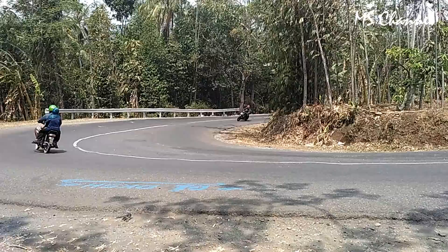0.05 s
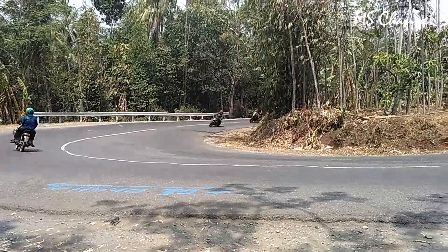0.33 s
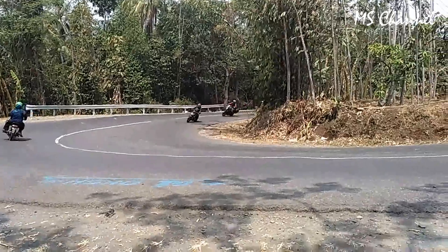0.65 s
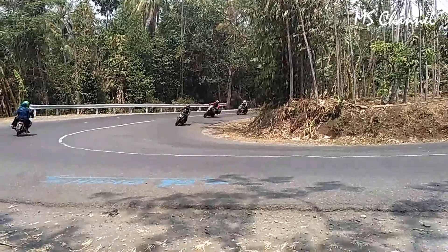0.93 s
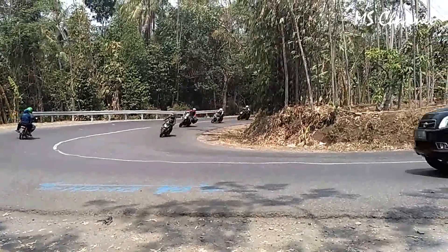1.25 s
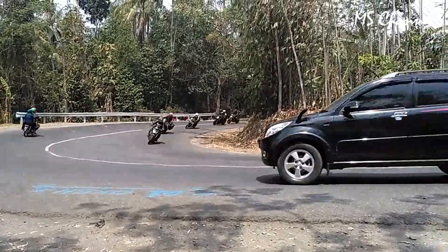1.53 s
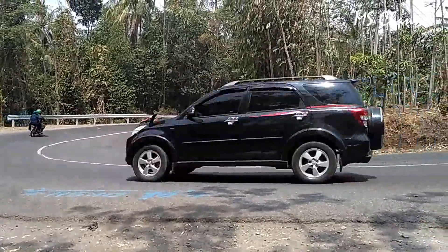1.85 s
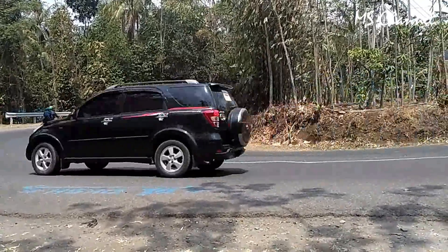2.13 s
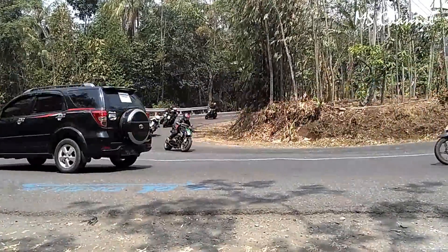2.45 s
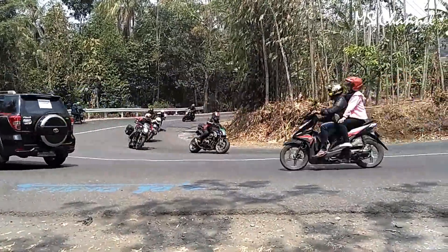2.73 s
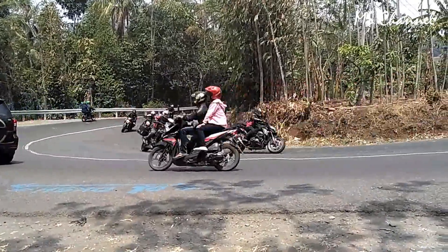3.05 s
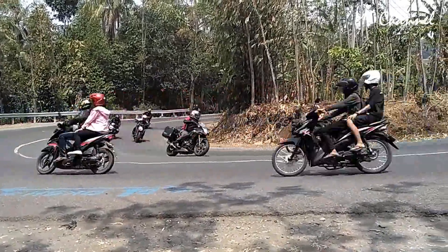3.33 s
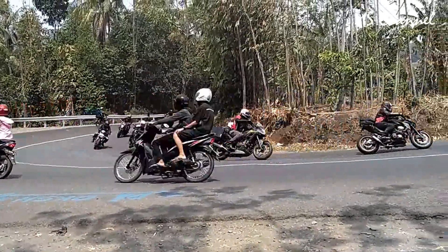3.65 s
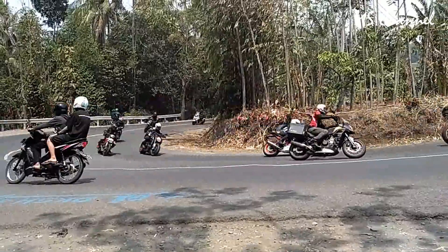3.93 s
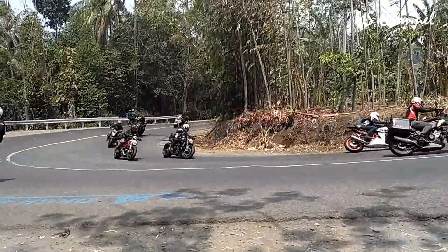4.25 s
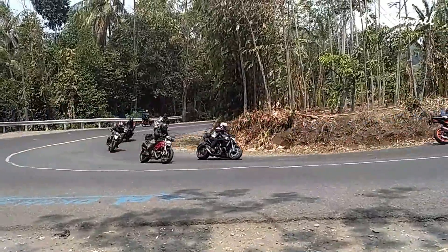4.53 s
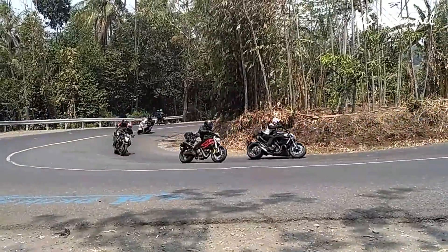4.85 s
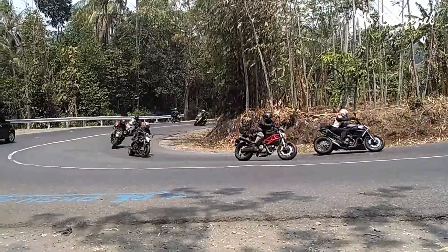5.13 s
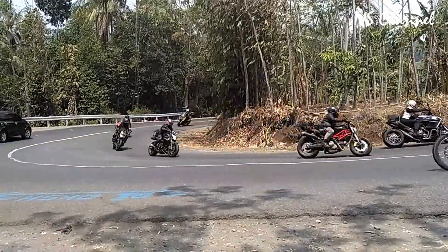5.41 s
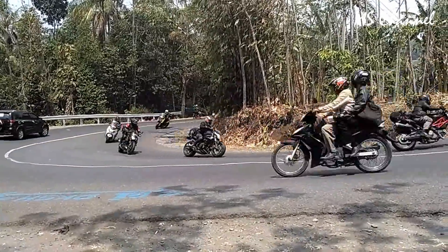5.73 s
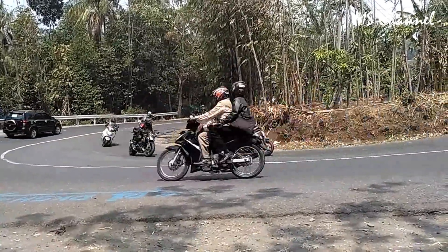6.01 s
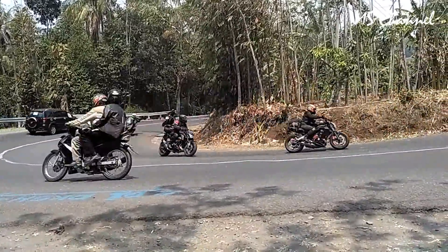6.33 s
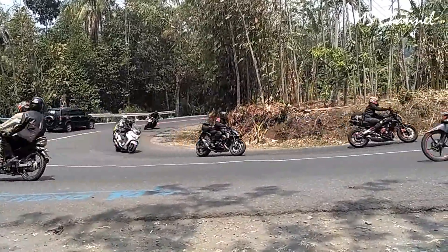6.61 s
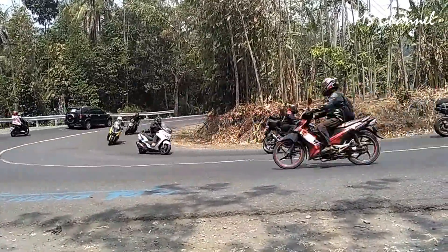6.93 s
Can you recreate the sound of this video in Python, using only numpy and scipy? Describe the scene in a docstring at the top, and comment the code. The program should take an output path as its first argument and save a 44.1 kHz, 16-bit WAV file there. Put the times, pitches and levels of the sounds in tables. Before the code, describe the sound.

A scooter and a car roll away round a bend on a forest road, and a throttle blips further off. A big twin-cylinder motorcycle revs close by, then accelerates with a barking, popping, rattling exhaust. A smoother bike climbs in pitch beside it while small scooters putter past. Tyres hiss and rumble underneath, and the trees return a short echo to the stereo microphones on the verge.

```python
"""A scooter and a car roll away round a bend on a forest road, heard from a microphone pair on the verge.
A far throttle is blipped, then a big twin revs close by and pulls out of the bend, barking and popping,
while a smoother bike climbs in pitch beside it and commuter scooters putter past. The low engine notes
are exhaust pulses ringing in silencers; the twin's rasp is turbulent gas and rattling steel.
Underneath, tyres hiss and rumble, and the trees send back a short echo."""
import sys
import numpy as np
from scipy import signal
from scipy.fft import rfft, irfft, next_fast_len
from scipy.io import wavfile
from scipy.ndimage import uniform_filter1d

SR = 44100
rng = np.random.default_rng(int(sys.argv[2]) if len(sys.argv) > 2 else 0)


def inscribe(sig):
    """Save sig as 16-bit PCM at rate SR to the path in sys.argv[1].

    A 1-D sig is mono; a 2-D sig holds one channel per row.
    Samples are clipped to [-1, 1] before scaling.
    """
    pcm = np.round(np.clip(np.atleast_2d(sig).T, -1, 1) * 32767)
    wavfile.write(sys.argv[1], SR, pcm.astype(np.int16))


N = 307377
TIME = np.arange(N) / SR

# silencer responses of the passing and blipped engines: frequency_hz, gain_db
LEAVING_PIPE = [(40, -18.5), (110, -4), (220, 2), (320, 2), (450, -31), (560, -19), (650, -11), (850, -23),
                (1200, -34.5), (4000, -56.5)]
SCOOTER_PIPE = [(40, -29), (78, 7), (130, 2.5), (250, 3), (340, -1.5), (450, -15), (650, -26.5), (900, -40),
                (1400, -33.5), (4000, -75)]
PUTTER_PIPE = [(50, -23.5), (75, -12.5), (130, -5), (195, 2.5), (255, -7.5), (340, 1), (450, -16.5),
               (650, -31.5), (900, -31), (1400, -37.5), (4000, -80)]
CAR_PIPE = [(60, -6.5), (112, -15), (168, 6), (225, -0.5), (278, 5), (340, -5), (450, -18), (560, -7),
            (690, -14), (900, -35), (4000, -65)]
BLIP_PIPE = [(50, -23.5), (160, -9), (240, 7), (320, 8.5), (410, -1), (500, -10), (700, -9), (900, -31),
             (1300, -59.5), (4000, -72)]
BOOM_PIPE = [(60, -19.5), (120, 6), (170, 10), (250, 2.5), (330, -6.5), (450, -15), (800, -21.5),
             (1300, -33.5), (4000, -67.5)]
SILENCERS = {"leaving": LEAVING_PIPE, "scooter": SCOOTER_PIPE, "putter": PUTTER_PIPE, "car": CAR_PIPE,
             "open": BLIP_PIPE, "boom": BOOM_PIPE}  # those responses by name
# the twin's exhaust surges under throttle: peak_s, rise_s, fade_s, bark_db, spit_db, rattle_db
SURGES = [(2.85, 0.036, 0.14, -47, -56, -50), (3.35, 0.13, 0.42, -45.5, -58, -56),
          (4.08, 0.18, 0.42, -36, -53, -74), (4.76, 0.24, 0.19, -24.5, -36.5, -60),
          (5.02, 0.063, 0.13, -28, -42, -56), (5.5, 0.12, 0.13, -26.5, -34.5, -37),
          (5.72, 0.15, 0.11, -32, -34, -33), (5.8, 0.016, 0.017, -31, -36, -28),
          (5.92, 0.075, .07, -33, -39.5, -36), (6.35, 0.28, 0.33, -30.5, -35.5, -32),
          (6.93, 0.28, 0.33, -33.5, -34.5, -36)]


def from_db(db):
    """Decibels to gain."""
    return 10 ** (np.asarray(db) / 20)


def unit_power(x):
    """Scale to a mean power of 1."""
    return x / np.sqrt(np.mean(x ** 2) + 1e-20)


def evened(x):
    """Hold the power at 1 over a few engine cycles."""
    return x / np.sqrt(np.abs(uniform_filter1d(x ** 2, size=SR // 8)) + 1e-12)


def in_time(rows):
    """Rows of (time_s, values...) as one curve per value, at every sample."""
    times_s, *columns = np.transpose(rows)
    return [np.interp(TIME, times_s, column) for column in columns]


def drift(rate_hz):
    """A random wander of spread near 1 that turns about rate_hz times a second."""
    return np.interp(TIME * rate_hz, np.arange(4000), rng.standard_normal(4000))


def swell(peak_s, rise_s, fade_s):
    """Gain of something that comes and goes: exponential flanks and a rounded top of 1."""
    away = np.maximum((peak_s - TIME) / rise_s, (TIME - peak_s) / fade_s)
    return 1 / np.cosh(np.minimum(away, 30))


def swells(rows, beam=1):
    """Swells (peak_s, rise_s, fade_s, level_db...) add in power, a gain per level; beam shortens them."""
    power = sum(np.outer(from_db(db), swell(peak_s, rise_s * beam, fade_s * beam)) ** 2
                for peak_s, rise_s, fade_s, *db in rows)
    return np.sqrt(power)


def coloured(x, spectrum):
    """Pass x through a causal (minimum-phase) body with this response: frequency_hz, gain_db."""
    size = next_fast_len(N + SR // 2) // 2 * 2
    hz, db = np.transpose(spectrum)
    bins_hz = np.arange(size // 2 + 1) * SR / size
    gain = from_db(np.interp(np.log(bins_hz + 1), np.log(hz), db))
    cepstrum = irfft(np.log(gain))
    cepstrum[1:size // 2] *= 2
    cepstrum[size // 2 + 1:] = 0
    return irfft(rfft(x, size) * np.exp(rfft(cepstrum, size)), size)[..., :N]


def moving_ring(x, hz, width_hz):
    """A resonance whose centre follows a curve."""
    turn = np.exp(2j * np.pi * np.cumsum(hz) / SR)
    pole = np.exp(-np.pi * width_hz / SR)
    return np.real(turn * signal.lfilter([1 - pole], [1, -pole], x / turn))


def unsteady_tone(hz):
    """A narrow, fluttering band that wanders around a pitch."""
    phase = 2 * np.pi * np.cumsum(hz * (1 + .016 * drift(60))) / SR
    flutter = from_db(3 * drift(14) - 1)
    return flutter * (drift(170) * np.sin(phase) + drift(170) * np.cos(phase))


def firings(cycle_hz, second_db, spacing, uneven_db, jitter, rough=1):
    """Two exhaust pulses an engine cycle, no two alike; spacing and jitter are shares of a cycle."""
    turns, pulses = np.cumsum(cycle_hz) / SR, np.zeros(N)
    cycle = np.arange(int(turns[-1]) - 1)
    roughness = np.interp(cycle + 1, turns, rough * np.ones(N))
    scatter = rng.standard_normal((700, 4))[cycle] * roughness[:, None]
    for k, (offset, db) in enumerate([(0, 0), (spacing, second_db)]):
        at = np.searchsorted(turns, cycle + 1 + offset + jitter * scatter[:, k])
        pulses[np.minimum(at, N - 1)] += from_db(db + uneven_db * scatter[:, k + 2])
    return pulses


def engine(cycle_hz, pipe, **firing):
    """Exhaust pulses ring in the silencer, at unit power."""
    return evened(coloured(firings(cycle_hz, **firing), pipe))


def puffs(pulses, decay_s, crack, flow):
    """Each pulse is a sharp crack and a dying puff of turbulence, over a steady flow of gas."""
    pole = np.exp(-1 / (decay_s * SR))
    envelope = unit_power(signal.lfilter([1], [1, -pole], pulses + 1e-18))
    return crack * unit_power(pulses) + (envelope + flow) * rng.standard_normal(N)


def placed(x, balance_db, lead_ms):
    """One source at the two microphones: the left is louder by balance_db and earlier by lead_ms."""
    shift_s = lead_ms / 2000
    pair = np.array([np.interp(TIME + shift, TIME, x) for shift in (shift_s, -shift_s)])
    gains = from_db([balance_db / 2, -balance_db / 2])
    return pair * gains / gains.mean(axis=0)


def forest(x, t60_s=.47):
    """Trunks and the earth bank scatter a short tail, thin in the bass, back to each microphone."""
    age = np.arange(SR // 2) / SR
    tail = rng.standard_normal((2, len(age))) * from_db(-60 * age / t60_s) * (age > .012)
    tail /= np.sqrt(np.sum(tail ** 2, axis=1, keepdims=True))
    echo = signal.fftconvolve(x[None], tail, axes=1)[:, :N]
    return coloured(echo, [(100, -17.5), (400, -5), (1000, -3), (3000, -2), (8000, 1.5)])


def road_noise(spectrum, width):
    """Smooth noise of rolling tyres, partly alike in the two microphones."""
    mid, side = rng.standard_normal((2, N))
    return unit_power(coloured(mid + width * side * np.array([[1], [-1]]), spectrum))


def tyres(far_hiss_db=-54, far_rumble_db=-37.5):
    """Hiss and rumble swell as tyres roll by the verge, over steady traffic further up the road."""
    roll_bys = [(.92, 0.12, 0.5, -50, -34), (1.45, 0.14, 0.29, -46.5, -40.5), (2.8, 0.17, 0.43, -46, -23.5),
                (3.45, 0.2, 0.56, -43, -25), (4.7, 0.61, 0.61, -35.5, -23), (5.75, 0.47, 0.76, -31, -28.5),
                (6.9, 0.2, 0.33, -31.5, -26.5)]  # closest_s, rise_s, fade_s, hiss_db, rumble_db
    hiss_colour = [(200, 11), (700, -1.5), (900, 15), (1150, 0.5), (2000, 4.5), (2700, 2), (3300, -3.5),
                   (5000, -5), (6700, -12.5), (8000, -40)]  # frequency_hz, gain_db
    rumble_colour = [(15, -15.5), (42, -21.5), (68, -2), (120, 3), (200, 0), (320, 0.5), (450, -15),
                     (750, -18), (1100, -40.5), (3000, -81)]  # frequency_hz, gain_db
    hiss_gain, rumble_gain = swells(roll_bys)
    hiss = np.hypot(hiss_gain, from_db(far_hiss_db)) * road_noise(hiss_colour, width=.88)
    rumble = np.hypot(rumble_gain, from_db(far_rumble_db)) * road_noise(rumble_colour, width=.049)
    return hiss, rumble


def road_thumps(rise_s=.018):
    """Soft, low thumps from the road swell and die within a few cycles."""
    thumps = [(.77, -28.5, 90), (2.036, -27, 71.7), (4.28, -21.5, 82.5)]  # start_s, peak_db, pitch_hz
    out = 0
    for start_s, db, hz in thumps:
        age = np.maximum(TIME - start_s, 0)
        envelope = age / rise_s * np.exp(1 - age / rise_s)
        out += from_db(db) * envelope * np.sin(2 * np.pi * hz * age)
    return out


def whines(turn_s=.23):
    """Faint whines sink in pitch as the car and scooters go by; there is one short squeak."""
    passes = [(.95, .07, .12, -60, 2630, 60), (1.47, .14, .13, -58, 2850, 90),
              (2.08, .14, .2, -61, 2310, 25), (2.98, .08, .06, -55, 2780, 80),
              (3.5, .06, .08, -56, 3020, 120)]  # closest_s, rise_s, fade_s, level_db, pitch_hz, half_drop_hz
    out = from_db(-42.5) * swell(2.828, .014, .014) * unsteady_tone(hz=2190)  # the squeak
    for closest_s, rise_s, fade_s, db, hz, half_drop_hz in passes:
        falling_hz = hz - half_drop_hz * np.tanh((TIME - closest_s) / turn_s)
        out += from_db(db) * swell(closest_s, rise_s, fade_s) * unsteady_tone(falling_hz)
    return out


def passing_engines(glide_s=.85):
    """Each small engine swells and fades while its pitch glides one way and levels off."""
    # peak_s, level_db, rise_s, fade_s, cycle_hz, glide_hz_per_s, second_pulse_db, silencer
    passes = [(0.849, -33.5, 0.72, 0.41, 54.5, -14, 3, "leaving"),
              (1.602, -29, 0.2, 0.15, 57.3, -6, -31, "car"),
              (2.251, -33.5, 0.065, 0.3, 51, -2, -21, "boom"),
              (2.72, -33, 0.12, 0.32, 49.2, -7.5, -11.5, "boom"),
              (3.35, -16, 0.068, 0.032, 43.3, -13.5, -3.5, "boom"),
              (3.499, -19.5, 0.1, 0.051, 40.7, -13, -3.5, "scooter"),
              (3.921, -25, 0.1, 0.06, 42, -3, -5, "scooter"),
              (5.048, -26, 0.17, 0.33, 66.5, -2, -6, "putter"),
              (5.751, -30.5, 0.38, 0.65, 70, 0.9, -4, "putter"),
              (6.95, -25, 0.27, .2, 80.3, 15, -6, "putter")]
    roughness = {"leaving": 1, "car": 1, "boom": 1.5, "scooter": 2.5, "putter": 4}  # unevenness of firing by silencer; 1 is a smooth runner
    out = 0
    for peak_s, db, rise_s, fade_s, cycle_hz, glide_hz_per_s, second_db, silencer in passes:
        speed = cycle_hz + glide_hz_per_s * glide_s * np.tanh((TIME - peak_s) / glide_s)
        note = engine(speed, SILENCERS[silencer], second_db=second_db, spacing=.5, uneven_db=1,
                      jitter=.005, rough=roughness[silencer])
        out += from_db(db) * swell(peak_s, rise_s, fade_s) * note
    return out


def throttle_blips():
    """A snapped throttle gives a short burst of ragged firings."""
    blips = [(1.441, -19.5, 41.8, "open"), (3.275, -14, 42, "boom"), (4.08, -26.5, 38, "open"),
             (6.864, -25.5, 72, "boom")]  # start_s, level_db, cycle_hz, silencer
    out = 0
    for start_s, db, cycle_hz, silencer in blips:
        speed = cycle_hz * (TIME > start_s - 1 / cycle_hz)  # one turn before the first firing
        note = engine(speed, SILENCERS[silencer], second_db=-4, spacing=.44, uneven_db=2.5, jitter=.04)
        opened = np.clip((TIME - start_s) * cycle_hz * 10 + 1, 0, 1)
        out += from_db(db) * opened * swell(start_s + .04, rise_s=.024, fade_s=.037) * note
    return out


def smooth_bike(howl_floor_db=-45):
    """An evenly firing engine sings a low note; its upper harmonics howl through the pipe's resonances."""
    climb = [(4.1, 90), (4.22, 92), (4.32, 89), (4.5, 95), (4.68, 97.8), (4.8, 101), (5.12, 109.5),
             (5.22, 115), (5.4, 122), (5.55, 127), (5.8, 133), (6.05, 144), (6.35, 153), (6.6, 159),
             (6.8, 166), (6.97, 160)]  # time_s, firing_hz
    low_partials = [(4, 4.11, 0.026, 0.052, -17), (3, 4.22, 0.044, .04, -21),
                    (3.2, 4.48, 0.054, 0.067, -19.5), (4, 4.46, 0.15, .3, -21.5),
                    (3, 4.78, 0.093, 0.087, -15.5), (4, 5.12, 0.026, 0.022, -27.5),
                    (2, 5.2, .03, .04, -16.5), (2, 5.62, 0.054, 0.057, -21.5), (3, 5.68, .11, 0.17, -25.5),
                    (3, 6.59, 0.16, .13, -22), (3, 6.78, 0.067, 0.083, -27.5)]  # pitch_ratio, peak_s, rise_s, fade_s, level_db
    pipe = [(450, -11.5), (630, 2.5), (760, -18), (885, 9.5), (945, -0.5), (1000, -4), (1125, 3),
            (1280, -11.5), (1490, 1.5), (1700, 0.5), (2000, -27)]  # frequency_hz, gain_db
    # the howl flares while the pipe points at the microphones: peak_s, rise_s, fade_s, level_db
    flares = [(5.48, 0.062, 0.047, -29.5), (6.15, 0.16, 0.19, -36.5), (6.6, 0.29, 0.53, -43.5)]
    (hz,) = in_time(climb)
    phase = 2 * np.pi * np.cumsum(hz * (1 + .009 * drift(30) + .016 * drift(160))) / SR

    def partial(ratio, waver_db):
        lope = 1 + .4 * np.sin(phase / 2 + rng.uniform(0, 2 * np.pi))
        return from_db(waver_db) * lope * np.sin(ratio * phase + rng.uniform(0, 2 * np.pi))

    note = howl = 0
    for ratio, peak_s, rise_s, fade_s, db in low_partials:
        waver_db = 1.8 * drift(18) + 2.6 * drift(70) - 1
        note += from_db(db) * swell(peak_s, rise_s, fade_s) * partial(ratio, waver_db)
    for ratio in range(5, 13):
        pipe_db = np.interp(ratio * hz, *np.transpose(pipe))
        howl += from_db(pipe_db) * partial(ratio, waver_db=3 * drift(70))
    howl_gain = np.sqrt(2) * np.hypot(from_db(howl_floor_db), swells(flares)[0])
    arrived = np.interp(TIME, [3.9, 4.08], [0, 1])
    return arrived * note, arrived * howl_gain * evened(howl)


def twin_speed():
    """The twin's engine cycles per second: a rev, then a long pull out of the bend."""
    speed = [(2.6, 41.11), (2.81, 41.0), (2.87, 47.5), (2.92, 48.5), (2.98, 53.0), (3.05, 54.7),
             (3.13, 51.5), (3.27, 42.0), (3.8, 41.5), (4.2, 41.27), (4.7, 43.29), (5.2, 45.36),
             (5.65, 50.33), (6.1, 55.72), (6.5, 62.26), (6.97, 68.32)]  # time_s, cycle_hz
    return in_time(speed)[0]


def twin_popping(before_pop_db=.5):
    """Strength of the twin's firings: now and then one pops hard, and the firing just before it is a little
    stronger too."""
    pops = [(3.985, 2.5), (4.132, 4), (4.203, 3), (4.276, 2), (4.299, 5), (4.396, 4), (4.442, 5),
            (4.791, 3.5), (4.884, 4), (4.952, 2.5), (4.998, 5), (5.085, 3.5), (5.131, 5), (5.654, 3),
            (5.945, 2), (6.055, 3.5), (6.315, 3), (6.367, 2), (6.513, 5), (6.942, 3)]  # time_s, boost_db
    speed, db = twin_speed(), 0
    for pop_s, boost_db in pops:
        cycles_away = np.round((TIME - pop_s) * speed)
        db += boost_db * (cycles_away == 0) + before_pop_db * (cycles_away == -1)
    return from_db(db)


def twin_rattle():
    """Every firing of the twin knocks thin steel, each mode with a strength of its own."""
    steel_modes = [(2170, 70, 13), (2533, 89, 12), (2870, 59, 0.5), (4140, 83, -3), (4900, 200, -3),
                   (5660, 180, -5)]  # pitch_hz, width_hz, level_db
    pitch_drift = [(5.6, 0.99), (5.88, 0.89), (6.1, 1.03), (6.33, 0.96), (6.5, 1.08), (6.7, 1.07),
                   (6.95, 0.93)]  # as the bikes change place: time_s, pitch_ratio
    (ratio,) = in_time(pitch_drift)
    strength, rings = twin_popping(), 0
    for hz, width_hz, db in steel_modes:
        pulses = strength * firings(twin_speed(), second_db=-9, spacing=.37, uneven_db=1.8, jitter=.008)
        knocks = puffs(pulses, decay_s=.002, crack=.9, flow=.08)
        rings += from_db(db) * moving_ring(knocks, hz * ratio, width_hz)
    return swells(SURGES, beam=.76)[2] * evened(rings)


def twin_rasp():
    """Under load the twin's open pipe barks through its throat and spits, one cylinder the harder."""
    bark_colour = [(300, -32.5), (550, 2.5), (800, 2.5), (1080, 5.5), (1350, 1.5), (1650, 4), (2100, -1),
                   (2600, -9.5), (3400, -13.5), (7000, -64.5)]  # frequency_hz, gain_db
    spit_colour = [(900, -9), (1800, -1.5), (2500, 3.5), (2900, 4.5), (3500, -4.5), (4400, -1),
                   (5600, -4.5), (6800, -9), (7700, -21.5), (9000, -59)]  # frequency_hz, gain_db
    throat_pitch = [(3.9, 1300), (4.1, 1310), (4.45, 1386), (4.8, 1210), (5.1, 1080), (5.55, 1140),
                    (6.2, 950), (6.97, 963)]  # sinks as the tail turns to the verge: time_s, pitch_hz
    bark_gain = swells(SURGES)[0]
    spit_gain = swells(SURGES, beam=.56)[1]  # treble is beamed, so it swells for less of each surge
    pulses = twin_popping() * firings(twin_speed(), second_db=-12, spacing=.42, uneven_db=.8, jitter=.01)
    # on a light throttle the gas flows evenly; the beats stand out hardest as the bike pulls away
    flow = np.interp(TIME, [3.7, 3.97, 5.15, 5.25, 5.45], [1.1, .05, .05, .35, .02])
    gas = coloured(puffs(pulses, decay_s=.0036, crack=.5, flow=flow), bark_colour)
    throat = moving_ring(gas, in_time(throat_pitch)[0], width_hz=260)
    bark = evened(evened(gas) + .65 * evened(throat))
    # the spit is scattered on its way, so each microphone gets turbulence of its own
    jets = np.array([puffs(pulses, decay_s=.004, crack=.18, flow=flow + .03) for _ in range(2)])
    return bark_gain * bark, spit_gain * evened(coloured(jets, spit_colour))


def twin_rev():
    """One free rev of the twin rises and drops, cleaner and brassier than the pull that follows."""
    loudness = [(2.7, -60), (2.79, -27.5), (2.86, -12.5), (2.95, -17.5), (3.05, -18), (3.18, -17),
                (3.27, -21.5), (3.4, -60)]  # time_s, level_db
    pipe = [(50, -24), (110, -13), (185, -6.5), (220, 3.5), (290, 6), (330, 2.5), (385, 3.5), (440, -3),
            (540, -5.5), (650, -15), (780, -15.5), (900, -22), (1100, -36), (2500, -48), (5000, -81.5)]  # frequency_hz, gain_db
    speed = twin_speed() * (1 + .008 * drift(40))
    note = engine(speed, pipe, second_db=-1.5, spacing=.5, uneven_db=1.7, jitter=.006)
    revving = np.interp(TIME, [2.6, 2.7, 3.4, 3.5], [0, 1, 1, 0])
    return revving * from_db(in_time(loudness)[0]) * note


def twin_pull():
    """The low note of the twin leaving the bend, ever lumpier in pitch and level under load."""
    loudness = [(3.15, -39.5), (3.3, -16.5), (3.6, -24), (3.72, -23), (4.25, -25.5), (4.7, -21.5), (5, -28),
                (5.35, -25), (5.55, -31), (6.1, -29.5), (6.65, -25.5), (6.97, -30)]  # time_s, level_db
    lumpiness = [(3.3, .7), (3.45, .5), (3.65, .8), (3.9, .8), (4.4, 1.1), (4.8, 1.6), (6.97, 1.6)]  # time_s, roughness_factor
    pipe = [(40, -21), (85, -11), (125, -14), (170, -2), (255, 4), (305, 3.5), (345, -1), (410, -2),
            (520, -5), (640, -15), (820, -15), (1050, -30.5), (2000, -53.5), (5000, -93)]  # frequency_hz, gain_db
    (db,), (rough,) = in_time(loudness), in_time(lumpiness)
    speed = twin_speed() * (1 + .02 * rough * drift(20))
    note = engine(speed, pipe, second_db=-1, spacing=.5, uneven_db=2, jitter=.02, rough=rough)
    burble_db = 1.5 * rough * drift(20)
    return np.interp(TIME, [3.05, 3.15], [0, 1]) * from_db(db + burble_db) * note


def scene():
    """Engines, road and trees as they reach the pair on the verge."""
    # the traffic's bearing, left microphone over right: time_s, rasp_lead_ms, note_pan_db, rasp_pan_db
    bearing = [(.5, 0.055, 7, 6), (3, -0.094, 6.5, 2), (3.5, 0.12, 2.5, 3), (4.3, 0.15, 2, -6),
               (5.1, 0.29, 2, -17.5), (5.7, 0.33, 2.5, -10), (6.4, 0.33, 2, 0.5)]
    lead_ms, note_pan_db, rasp_pan_db = in_time(bearing)
    smooth_note, howl = smooth_bike()
    bark, spit = twin_rasp()
    notes = passing_engines() + throttle_blips() + twin_rev() + twin_pull() + smooth_note + road_thumps()
    traffic = placed(notes, note_pan_db, lead_ms * .74)
    traffic += placed(bark + howl + twin_rattle(), rasp_pan_db, lead_ms)
    traffic += spit * from_db([[2], [-2]])  # left of centre
    traffic += whines()
    hiss, rumble = tyres()
    echo = forest(notes + howl + bark + spit.mean(axis=0))
    sides = from_db([note_pan_db / 2, -note_pan_db / 2])
    return traffic + hiss * sides ** .58 + rumble * sides + echo * np.sqrt(sides)


def bass_limiter(x, split_hz, ceiling_db):
    """Each channel's bass is turned down within a few cycles whenever it swells past the ceiling."""
    bass = signal.sosfiltfilt(signal.butter(3, split_hz, fs=SR, output="sos"), x)
    power = np.abs(uniform_filter1d(uniform_filter1d(bass ** 2, size=SR // 150), size=SR // 150))
    overload = power / from_db(ceiling_db) ** 2
    return x - bass + bass / (1 + overload ** 2) ** .25


def record(dry):
    """Sound starts and stops abruptly; the bass is limited, loud peaks are rounded and the top is cut."""
    start_s, peak, cutoff_hz = .548, .62, 8100
    held = bass_limiter(dry * from_db(2), split_hz=515, ceiling_db=-15)
    rounded = peak * np.tanh(held / peak)
    running = np.clip(np.minimum(TIME - start_s, TIME[-1] - TIME) / .003, 0, 1)
    return signal.sosfilt(signal.butter(20, cutoff_hz, fs=SR, output="sos"), rounded * running)


dry = scene()
out = record(dry)
inscribe(out)
```